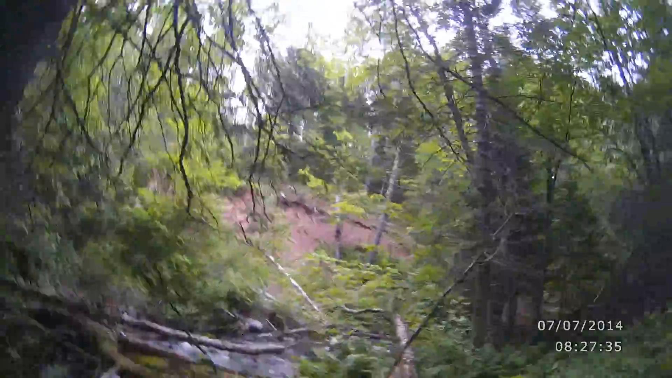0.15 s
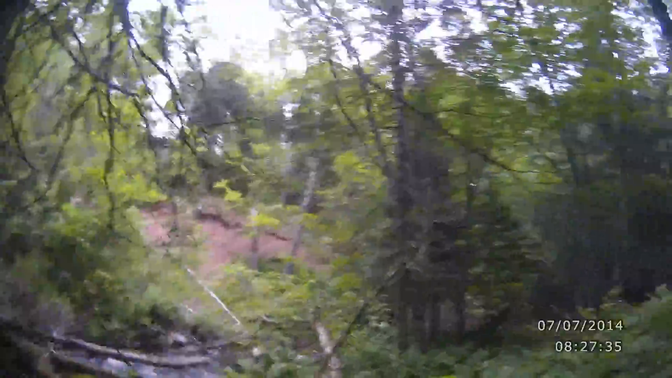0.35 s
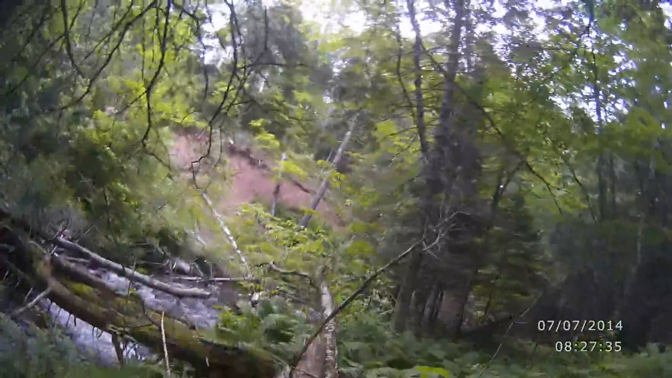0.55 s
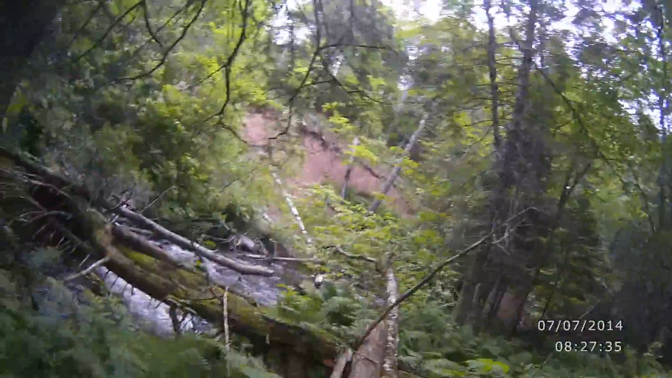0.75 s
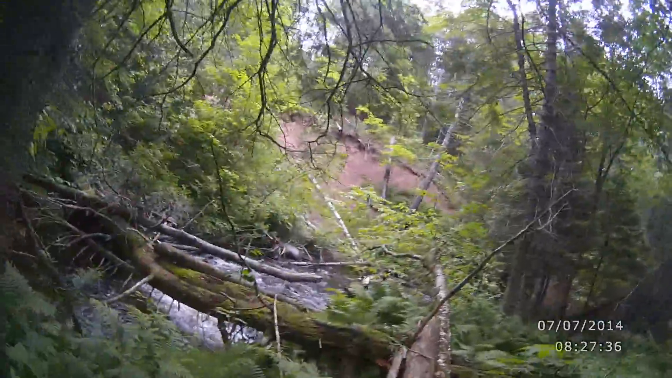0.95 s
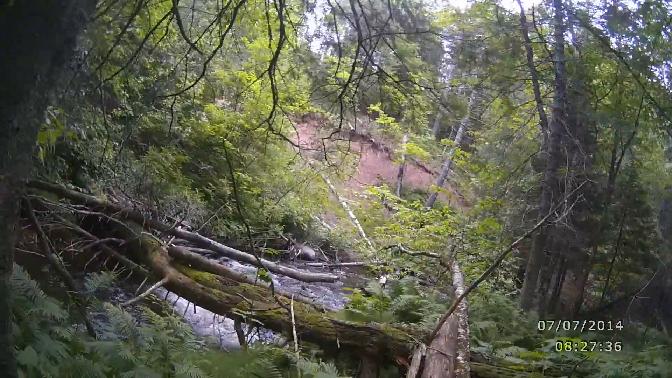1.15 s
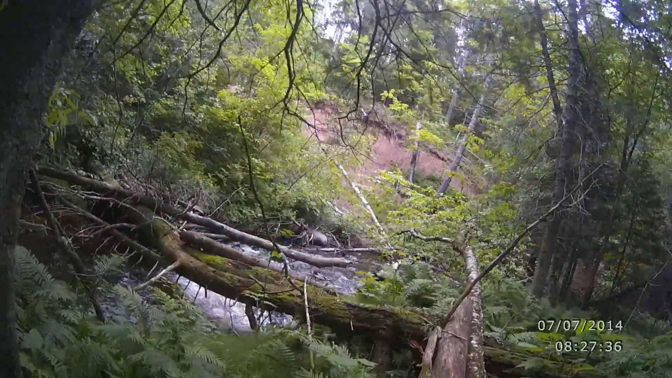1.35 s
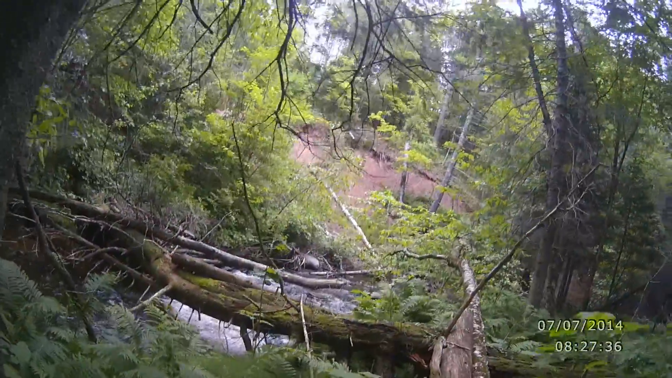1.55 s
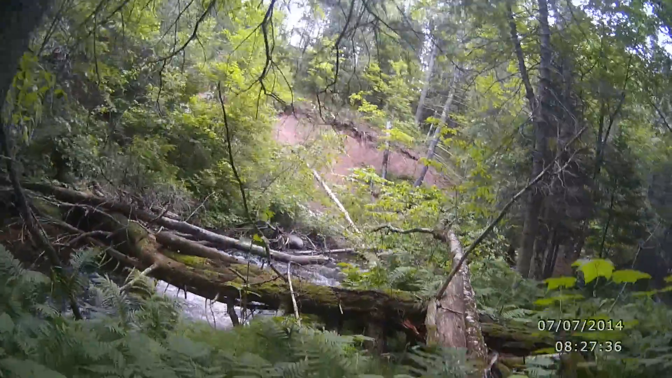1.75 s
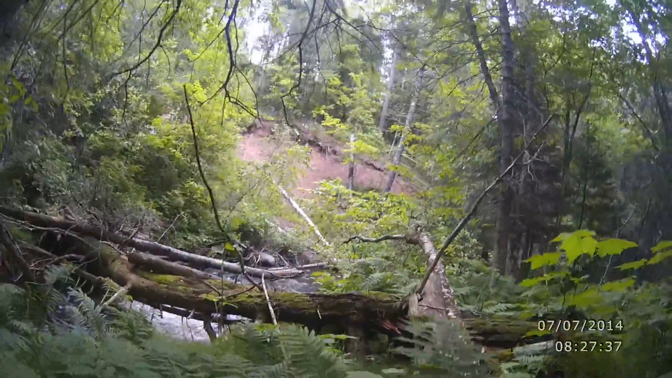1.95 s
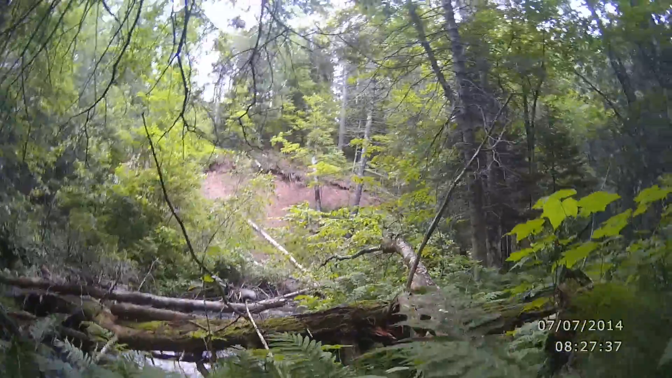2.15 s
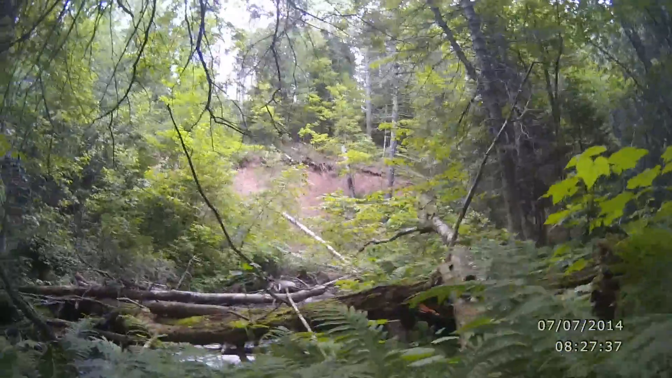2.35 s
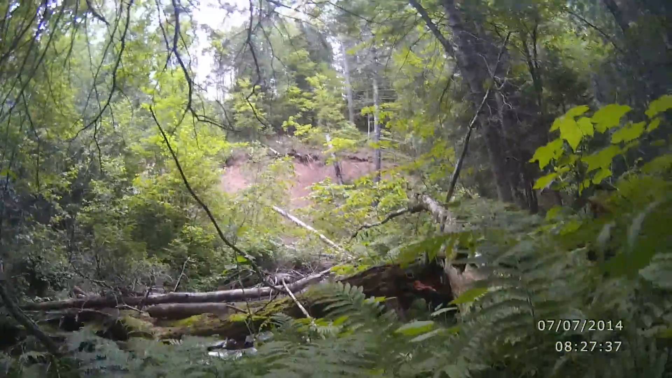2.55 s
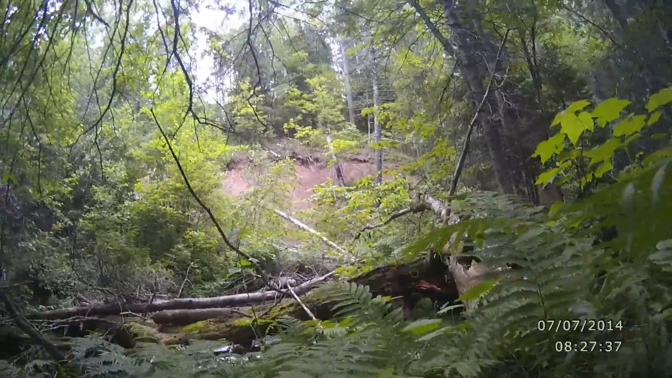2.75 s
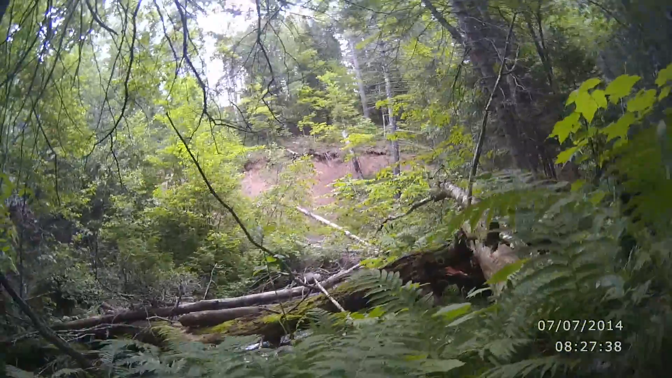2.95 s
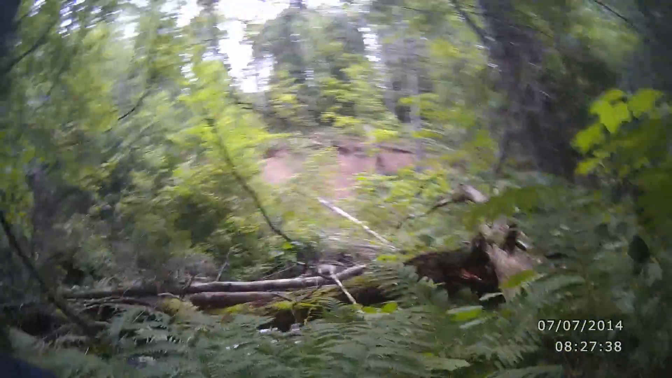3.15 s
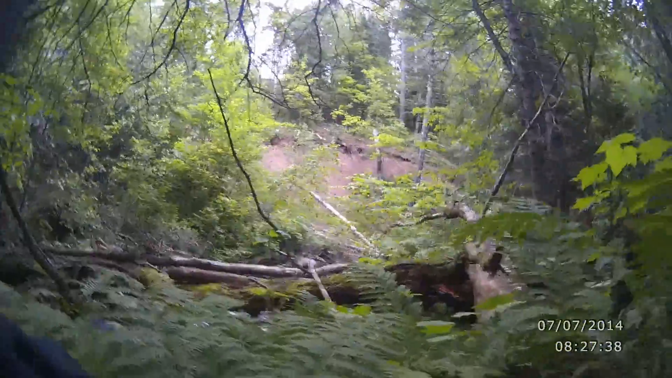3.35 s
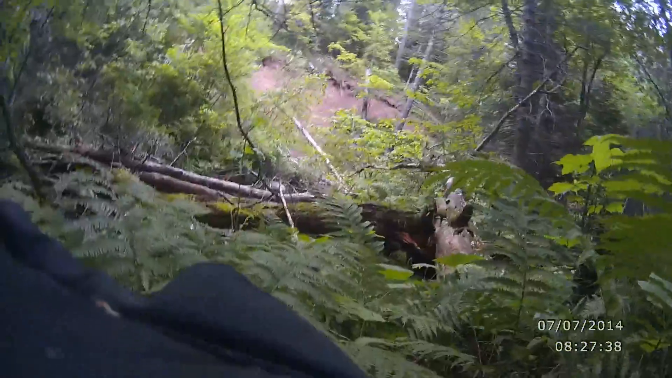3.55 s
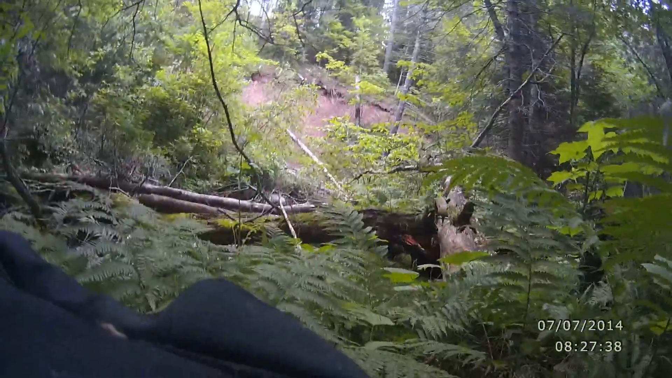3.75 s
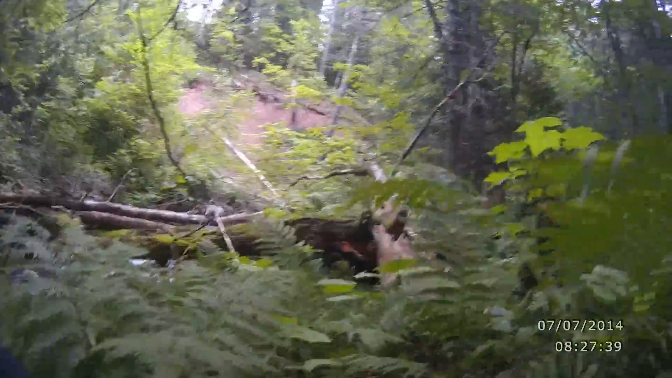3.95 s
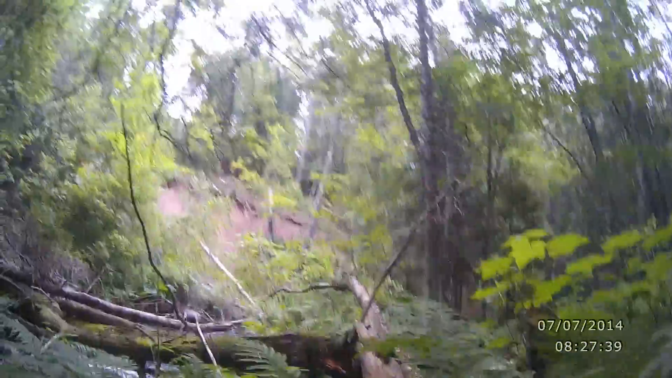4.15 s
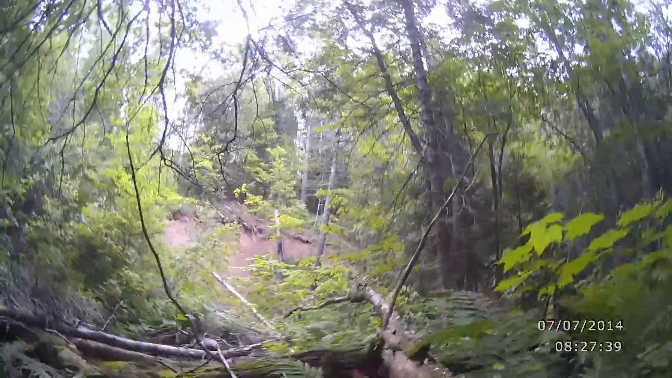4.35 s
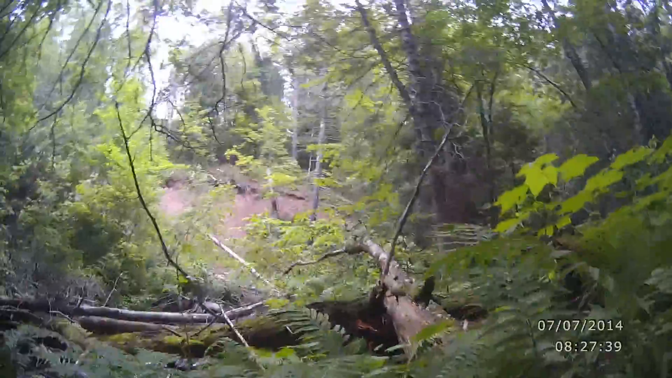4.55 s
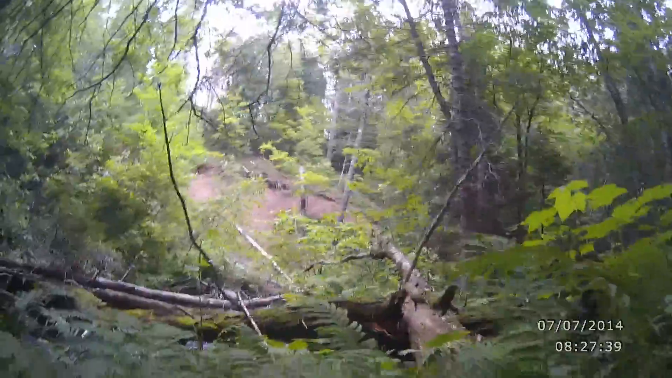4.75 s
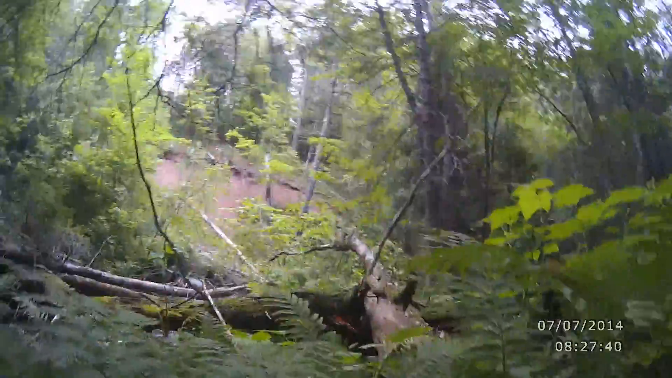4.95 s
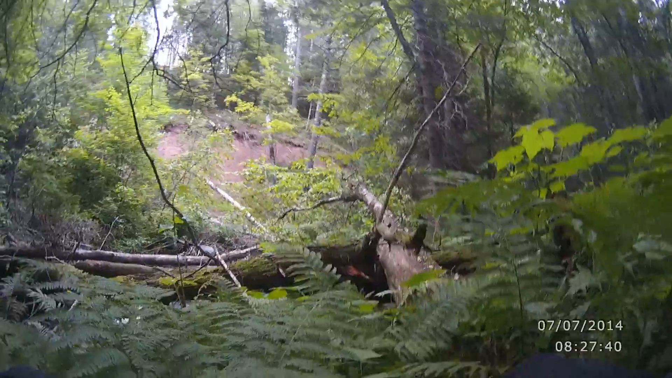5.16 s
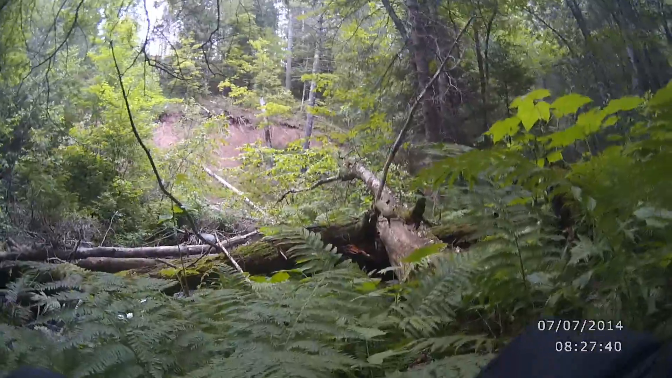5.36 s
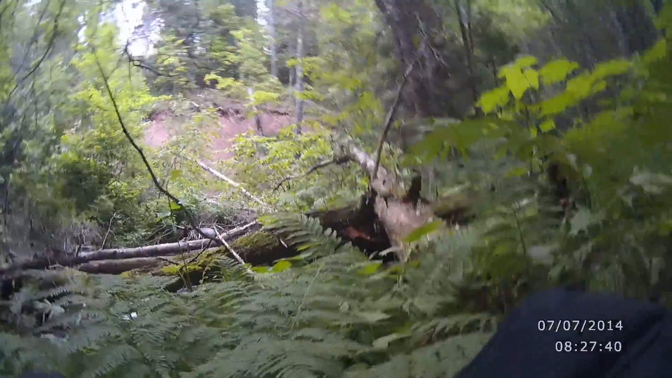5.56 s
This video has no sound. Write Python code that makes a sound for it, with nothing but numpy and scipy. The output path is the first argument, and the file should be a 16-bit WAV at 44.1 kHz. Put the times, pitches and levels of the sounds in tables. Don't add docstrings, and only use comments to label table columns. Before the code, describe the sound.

Steady bubbling rush of a shallow stream, swelling in at first, interrupted by sharp handling clicks, dull taps and a loud clipped knock.

```python
import sys
import numpy as np
from scipy import signal
from scipy.fft import rfft, irfft, next_fast_len
from scipy.io import wavfile
from scipy.ndimage import uniform_filter1d, minimum_filter1d, map_coordinates

SR = 44100
rng = np.random.default_rng(int(sys.argv[2]) if len(sys.argv) > 2 else 0)


def invert_db(level):
    return 10 ** (np.asarray(level, dtype=float) / 20)


def int16_out(signal):
    q = np.round(np.clip(np.atleast_2d(signal).T, -1, 1) * 32767)
    wavfile.write(sys.argv[1], SR, q.astype(np.int16))


N = 247401


def unit(x):
    return x / np.sqrt(np.mean(x ** 2) + 1e-20)


def along(points, hz):
    f, v = np.transpose(points)
    return np.interp(np.log(hz + 1), np.log(f + 1), v)


def curves(rows):
    s, *cols = np.transpose(rows)
    return [np.interp(np.arange(N) / SR, s, c) for c in cols]


def wobble(rate):
    knots = rng.standard_normal(int(N * rate / SR) + 4)
    return map_coordinates(knots, [np.arange(N) * rate / SR])


def filtered(x, response):
    m = next_fast_len(len(x) + 8192)
    return irfft(rfft(x, m) * response(np.fft.rfftfreq(m, 1 / SR)), m)[:len(x)]


def highpass(x, hz):
    return signal.sosfilt(signal.butter(2, hz, "high", fs=SR, output="sos"), x)


def ring(hz, t60, t):
    return invert_db(-60 * t / t60) * np.sin(2 * np.pi * hz * t)


def patchy(depth_db):
    z = signal.stft(rng.standard_normal(N + 512), nperseg=512)[2]
    field = uniform_filter1d(rng.standard_normal(z.shape), size=6, axis=0)
    field = uniform_filter1d(field, size=16, axis=1)
    return signal.istft(z * invert_db(depth_db * unit(field)), nperseg=512)[1][:N]


def gain_db():
    t = np.arange(N) / SR
    duck_s, duck_db, hold_s, recovery_s = 4.96, 3, 0.1, 0.28
    opening_db = np.minimum(-46 + 9 * t, -33.5)
    recovered = np.clip((t - duck_s - hold_s) / recovery_s, 0, 1)
    return opening_db - duck_db * (t > duck_s) * (1 - recovered)


# (frequency [Hz], density [dB per Hz])
RUSH_SPECTRUM = [(40, -67), (90, -39), (150, -19), (260, -10), (480, -3.5), (900, -1), (1300, -3.5),
                 (2200, -5.5), (2900, -8.5), (3600, -10), (4900, -10), (6700, -16.5), (7300, -18.5),
                 (9500, -29)]


def rush(facing_db):
    bank_db, clear_s, edge_s = 2.5, 0.71, 0.05
    hidden_db = bank_db / (1 + np.exp((np.arange(N) / SR - clear_s) / edge_s))
    white = patchy(depth_db=1.0)
    colour = lambda hz: invert_db(along(RUSH_SPECTRUM, hz))
    low = lambda hz: 1 / (1 + (hz / 450) ** 4)
    high = lambda hz: 1 / (1 + (3000 / (hz + 1)) ** 4)
    middle = filtered(white, lambda hz: colour(hz) * (hz > 600) * (hz < 2800))

    gurgle_db = -2 - 0.1 * facing_db - hidden_db + 2.1 * wobble(7)
    gurgle = invert_db(gurgle_db) * filtered(white, lambda hz: colour(hz) * low(hz))
    body = invert_db(facing_db) * filtered(white, lambda hz: colour(hz) * (1 - low(hz) - high(hz)))
    spray = filtered(white, lambda hz: colour(hz) * high(hz))
    return (gurgle + body + spray) / np.std(middle)


# (time [s], typical bubble pitch [Hz])
RIFFLE_PITCH = [(0, 1024), (.8, 1120), (1.5, 1274), (2.2, 1092), (3, 884), (4.3, 912), (5, 1084),
                (5.61, 1164)]


def bubbles(count, spread, cycles, scatter_db):
    draw = rng.random((count, 2))
    t = np.arange(600) / SR
    start = (draw[:, :1] * N).astype(int)
    detune = np.exp(spread * np.clip(rng.standard_normal((count, 1)), -1.5, 2))
    hz = curves(RIFFLE_PITCH)[0][start] * detune
    age = t * hz / cycles
    size = invert_db(-scatter_db * np.log(0.03 + draw[:, 1:]))
    swell = size * age * np.exp(-3 * age)
    fade = np.cos(np.pi / 2 * t / t[-1])
    tone = swell * np.sin(2 * np.pi * hz * t * (1 + 0.11 * age)) * fade
    froth = np.bincount((start + np.arange(len(t))).ravel(), tone.ravel())[:N]
    return unit(filtered(froth, lambda f: 1 / (1 + (250 / (f + 1)) ** 4)))


def echo(x, path, band):
    delay_ms, strength = curves(path)
    late = map_coordinates(x, [np.arange(N) - delay_ms * SR / 1000])
    return -np.clip(strength, 0, .9) * filtered(late, band)


# (time [s], delay [ms], strength [0-1])
BODY_PATH = [(0, 0.47, 0.2), (.3, 0.75, 0.06), (1.2, 1.16, 0.2), (2.2, 0.6, 0), (3.1, 0.6, 0.03),
             (3.8, 0.58, 0.14), (4.2, 0.746, 0.2), (4.7, 0.88, 0.18), (5.05, 1.1, 0.1), (5.61, 1.02, 0.26)]


def body_echo(near):
    return echo(near, BODY_PATH, lambda hz: 1 / (1 + (1300 / (hz + 1)) ** 2))


# (time [s], delay [ms], strength [0-1])
GROUND_PATH = [
    (0, 2.26, 1),
    (.7, 2.63, 0.4),
    (1.4, 2.93, 0.58),
    (1.9, 6.3, 0),
    (5.61, 5.4, 0.02),
]


def ground_echo(near):
    return echo(near, GROUND_PATH, lambda hz: 1 / (1 + (hz / 650) ** 4))


# (frequency [Hz], density [dB per Hz])
PORT_SPECTRUM = [(4880, -14.5), (8300, 0), (8590, 1), (9160, 0), (10500, -7.5), (14000, -15.5),
                 (15000, -20)]


def port_hiss(facing_db):
    colour = lambda hz: invert_db(along(PORT_SPECTRUM, hz)) * hz ** 2 / (hz ** 2 + 90 ** 2)
    return invert_db(-5 + 0.6 * facing_db) * unit(filtered(patchy(depth_db=0.1), colour))


# (time [s], level of the rush [dB])
FACING = [(0, 0.5), (.6, -1), (1.15, 1), (1.65, -2), (2, -2), (2.4, -3), (3.5, -2.5), (3.9, -2), (4.7, -3),
          (5, -2), (5.2, -3), (5.61, -2)]


def creek():
    facing_db, = curves(FACING)
    froth = bubbles(count=5000, spread=0.402, cycles=9.9, scatter_db=2.0)
    near = rush(facing_db) + invert_db(facing_db - 10.5) * froth
    water = near + body_echo(near) + ground_echo(near) + port_hiss(facing_db)
    surge_db = 0.15 * wobble(3.12) + 0.49 * wobble(12)
    return invert_db(gain_db() + surge_db) * water


# (time [s], rumble level [dB])
GRIP_RUMBLE = [
    (0, -97),
    (2.5, -92),
    (3.4, -72),
    (4.6, -69),
    (5.61, -90),
]


def grip_rumble():
    rumble = unit(filtered(rng.standard_normal(N), lambda hz: 1 / (1 + (hz / 40) ** 2)))
    tight_db, = curves(GRIP_RUMBLE)
    return invert_db(tight_db + 3 * wobble(5.5)) * rumble


# (time [s], peak level [dB], ring t60 [s])
SEAM_TICKS = [
    (1.0416, -16.5, .0025),
    (1.318, -29, .004),
    (4.7483, -18, .005),
    (4.767, -19.5, .006),
    (4.9487, -8, 0.0057),
    (4.959, -19, .005),
]


def ticks():
    out, t = np.zeros(N + SR), np.arange(SR // 50) / SR
    for s, db, t60 in SEAM_TICKS:
        snap = ring(9480, t60, t)
        snap += 0.49 * ring(10500, 0.7 * t60, t)
        snap += 0.12 * ring(13000, 0.33 * t60, t)
        onset = 1 - np.exp(-t / .00007)
        out[round(s * SR):][:len(t)] += invert_db(db + 1.5) * snap * onset
    return out[:N]


# (time [s], level [dB], pitch [Hz])
HAND_SHIFTS = [(1.54, -76, 30), (1.681, -54, 55), (1.71, -55, 50), (1.76, -63, 40), (1.82, -67, 45),
               (2.431, -61, 170), (2.95, -71, 30), (3.32, -52, 70), (3.555, -50, 90), (3.894, -46, 59.5),
               (4.28, -63, 50), (4.585, -55, 110), (4.7463, -31, 165), (4.952, -44, 120)]


def thumps():
    out, t = np.zeros(N + SR), np.arange(SR // 10) / SR
    for s, db, hz in HAND_SHIFTS:
        u = 2 * np.pi * hz * t
        out[round(s * SR):][:len(t)] -= invert_db(db + 24.5) * u * (1 - u / 2) * np.exp(-u)
    return highpass(out[:N], 60)


# (frequency [Hz], level [dB], ring t60 [s])
CASE_MODES = [(428, -11, 0.096), (793, -3.5, 0.016), (1210, -5, 0.048), (1576, -3.5, 0.094),
              (1970, 2.5, 0.019), (2010, -4, 0.026), (2590, -6.5, 0.031), (3500, -16.5, 0.017),
              (5040, -15, 0.017), (5700, -21, .008)]


def case_rest(contact_ms, rattle_t60, t):
    modes = np.zeros(len(t))
    for k, (hz, level_db, t60) in enumerate(CASE_MODES):
        modes += invert_db(level_db + rng.normal(0, 2.2)) * ring(hz, t60, t) * (-1) ** k
    spectrum = [(hz, db) for hz, db, _ in CASE_MODES] + [(8000, -14.5), (16000, -48)]
    rattle = unit(filtered(rng.standard_normal(len(t)), lambda hz: invert_db(along(spectrum, hz))))
    rattle = rattle * invert_db(-60 * t / rattle_t60)
    soft = lambda hz: 1 / (1 + (hz * contact_ms / 2500) ** 2)
    return filtered(invert_db(-9) * modes + invert_db(-0.5) * rattle, soft)


def contacts(touches, case_db, ring_s):
    out, t = np.zeros(N + SR), np.arange(SR // 10) / SR
    for s, db, hz, contact_ms in touches:
        t60 = ring_s * contact_ms ** 0.7
        rest = case_rest(contact_ms, 2.47 * t60, t)
        rise = 1 - np.exp(-1000 * t / contact_ms)
        out[round(s * SR):][:len(t)] += invert_db(db) * rise * (ring(hz, t60, t) + invert_db(case_db) * rest)
    return out[:N]


# (time [s], peak level [dB], main ring [Hz], contact time [ms])
NAIL = [
    (2.409, -10, 3550, 0.023),
    (2.4309, -13, 1630, 0.22),
    (2.4307, -9, 2280, .1),
    (2.4308, -18, 520, 0.31),
]
PADS = [(2.986, -31, 317, 4.6), (3.045, -22, 1060, 1.1), (3.098, -20, 935, 2.5), (3.108, -26, 295, 4),
        (3.1062, -11.5, 805, 1.7), (3.126, -17.5, 725, 1), (3.1689, -18.5, 945, 2.5),
        (3.174, -19, 1140, 0.36), (3.02, -27, 935, 2), (4.008, -24, 1010, 1.3), (4.245, -22, 1000, 1.1)]
KNUCKLE = [
    (4.58, -26, 1280, 1.8),
    (4.5875, -15, 995, 0.57),
    (4.643, -24, 1290, 0.72),
    (4.7013, -12.5, 1230, .45),
    (4.7012, -15, 1970, .45),
    (4.712, -16, 1270, 1.3),
    (4.7506, -10, 1270, .55),
    (4.7508, -14, 1910, .45),
    (4.758, -19, 1620, .7),
]
CRACK = [(4.9338, -15, 654, 1.4), (4.9457, -8, 1560, 0.27), (4.9512, 3, 2390, 0.36),
         (4.9522, -3.5, 1570, .25), (4.9532, -12, 770, 1.2), (4.9585, 2, 1890, 0.23),
         (4.9619, -2, 1820, 0.14), (4.9665, 1.5, 2140, 0.084), (4.9692, -7, 1870, 0.57),
         (4.9741, -4, 2130, .1), (4.974, -16.5, 282, 4.5), (4.977, -15, 1710, 1.1),
         (4.986, -20, 1460, 0.96)]


def knocks():
    out = contacts(NAIL, case_db=-15, ring_s=0.029)
    out += contacts(PADS, case_db=-6.5, ring_s=0.023)
    out += contacts(KNUCKLE, case_db=-4, ring_s=0.032)
    out += contacts(CRACK, case_db=-7, ring_s=0.027)
    return highpass(out, 200)


def scene():
    return np.tile(creek() + grip_rumble() + ticks() + thumps() + knocks(), (2, 1))


# (frequency [Hz], share of the band's usual power [ratio])
DROPPED = [(7700, 0), (7880, .9), (8060, 0), (9500, .08), (10800, .3), (12200, .55), (14800, .6),
           (15050, 1.2), (15300, 3), (15600, 20), (16400, 100)]


def thinned(x):
    hop = 1024
    hz, _, z = signal.stft(x, SR, nperseg=2048, noverlap=hop)
    power = (np.abs(z[:1024]) ** 2).reshape(256, 4, -1).mean(axis=1)
    centre = hz[:1024].reshape(256, 4).mean(axis=1)
    frame_start = np.minimum(np.arange(power.shape[1]) * hop, N - 1)
    gain = invert_db(2 * gain_db()[frame_start])
    usual = gain * np.median(power / gain, axis=1, keepdims=True)
    strong = power >= along(DROPPED, centre)[:, None] * usual
    keep = np.repeat(minimum_filter1d(strong * 1., size=2, axis=0), 4, axis=0)
    keep = np.vstack([keep, keep[-1:]])
    return signal.istft(z * keep, SR, nperseg=2048, noverlap=hop)[1][:N]


def top_cut(x):
    return signal.sosfilt(signal.butter(12, 16410, fs=SR, output="sos"), x)


def record(dry):
    x = dry[0] / (1 + np.abs(dry[0] / .71) ** 12) ** (1 / 12)

    def microphone(hz):
        off_notch = (hz * hz - 7880 ** 2) ** 2
        notch = off_notch / (off_notch + (hz * 600) ** 2) + .008
        edge = invert_db(-np.clip(hz - 14700, 0, None) / 70)
        return notch * edge * hz ** 2 / (hz ** 2 + 30 ** 2)

    x = thinned(filtered(x, microphone))
    start_s, fade_s = 0.069, 0.011
    x = x * np.clip((np.arange(N) / SR - start_s) / fade_s, 0, 1)
    return top_cut(np.array([x, x]))


dry = scene()
out = record(dry)
int16_out(out)
```